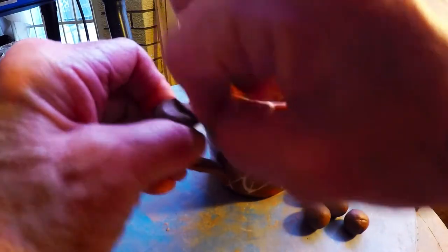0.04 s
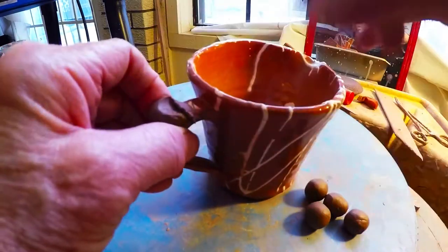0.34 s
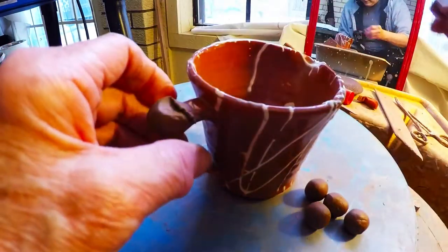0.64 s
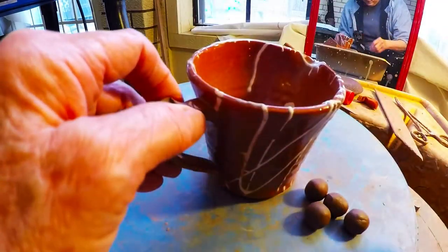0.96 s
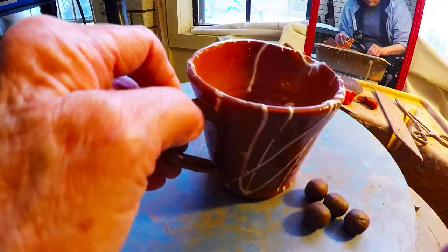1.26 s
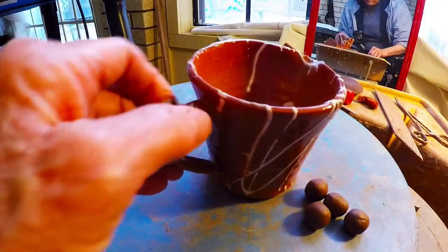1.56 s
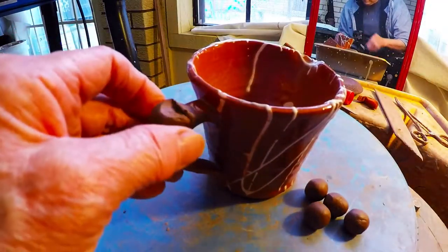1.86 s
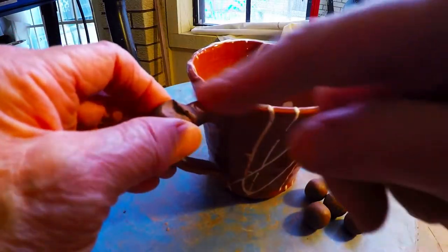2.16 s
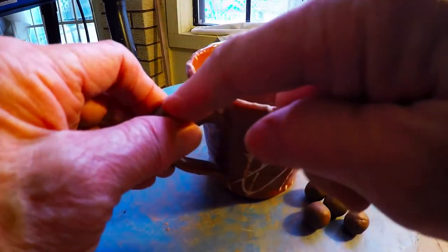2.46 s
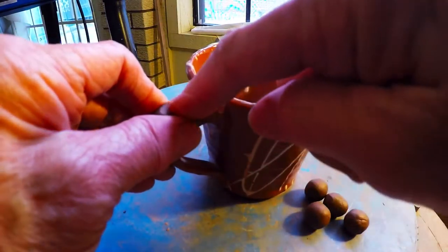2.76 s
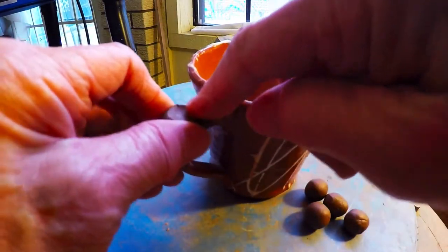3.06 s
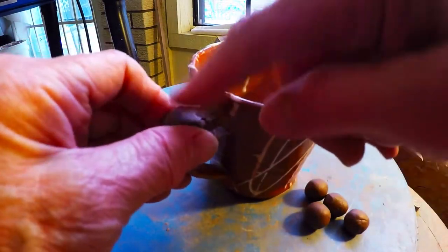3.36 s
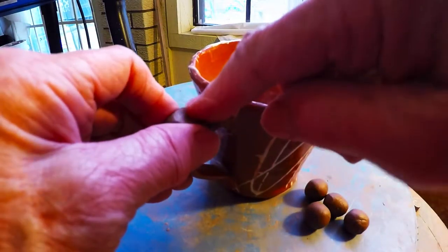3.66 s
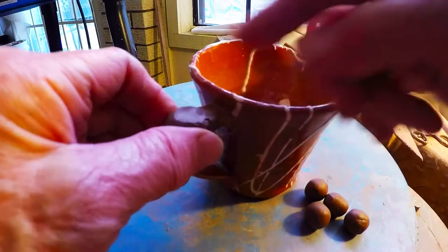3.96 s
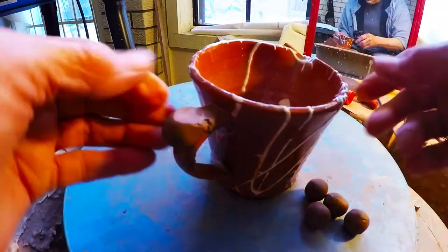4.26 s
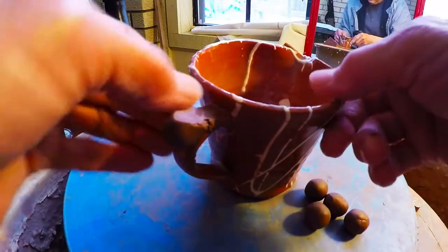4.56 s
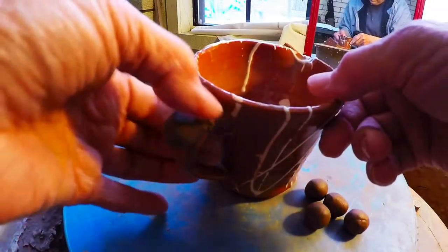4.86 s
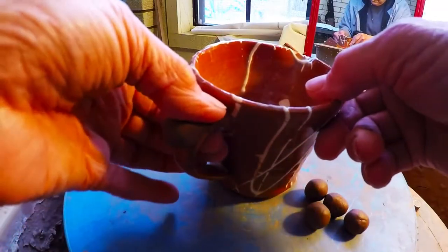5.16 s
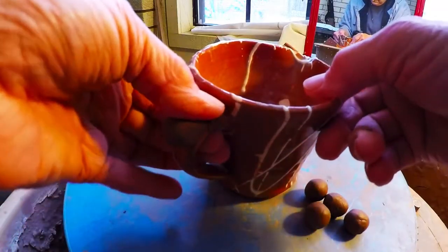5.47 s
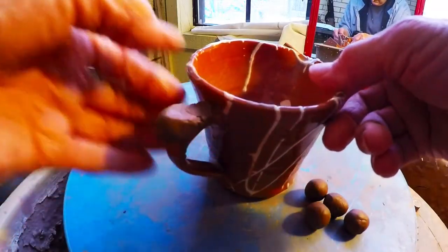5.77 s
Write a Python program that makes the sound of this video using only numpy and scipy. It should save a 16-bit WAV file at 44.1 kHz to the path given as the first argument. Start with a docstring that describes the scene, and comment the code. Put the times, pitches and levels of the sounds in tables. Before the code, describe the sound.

A few dull knocks from a rocking pottery wheel and mug, between faint, short smears and tiny ticks of damp clay.

```python
"""Smoothing clay onto a mug handle

A quiet studio, the microphone close to a damp mug on a banding wheel. Fingers press and smear soft clay
onto the handle; skin drags on the clay and sounds the mug and the wheel. When a hand lets go, the wheel
rocks with a dull knock and the bench shudders. Sticky clay parts from the skin with tiny ticks."""
import sys
import numpy as np
from scipy import signal
from scipy.fft import rfft, irfft, next_fast_len
from scipy.io import wavfile
from scipy.ndimage import map_coordinates

SR = 44100
rng = np.random.default_rng(int(sys.argv[2]) if len(sys.argv) > 2 else 0)


def waveform_to_disk(signal):
    """Save audio, clipped to [-1, 1], as 16-bit WAV at the path in sys.argv[1]."""
    frames = np.transpose(np.atleast_2d(signal))
    scaled = np.clip(frames, -1, 1) * 32767
    samples = np.round(scaled).astype(np.int16)
    wavfile.write(sys.argv[1], SR, samples)


N = 265305

# resonances of wheel, hollow mug, handle and mug wall: (frequency [Hz], width [Hz], gain [dB])
WHEEL_BODY = [(331, 73, -1), (385.7, 56, 1), (560, 51, -10.5)]
MUG_BODY = [(775, 40, -4), (849, 71, -3), (1062, 37, -25)]
HANDLE_BODY = [(575.7, 106, 2.5), (1074, 150, -7.5)]
MUG_WALL = [(1723, 74, 7), (2026, 290, -1.5), (2550, 230, -2), (3265, 90, -6), (3740, 300, -3),
            (4096, 190, 0), (5640, 430, -12), (9300, 610, -13)]
# rasp of the grit in the clay: (frequency [Hz], gain [dB])
GRIT_SPECTRUM = [(500, -16.5), (1200, 7), (2000, -8.5), (3100, -5), (4000, -4.5), (4700, -5.5),
                 (6100, -6.5), (7200, -13.5), (11000, -17.5), (15500, -23)]
# finger strokes, close up:
# (time [s], length [s], force [dB], mug share [dB], handle share [dB], grit share [dB])
STROKES = [(0.064, .015, -51.5, -18, -1, -5.5), (0.084, 0.059, -45.5, -16, -1.5, -4.5),
           (0.146, .055, -34.5, -4, -6, -8), (1.562, 0.017, -55.5, 1.5, -24, -7),
           (1.643, 0.033, -55.5, 7, -16, -7.5), (1.774, 0.046, -56.5, -5, -24, -23),
           (2.176, 0.04, -60, 3, -19, -7), (2.4, 0.022, -57, -10, -25, -12),
           (3.041, 0.039, -53, 13, -6, 3.5), (3.08, 0.071, -47.5, -1, -21, -6),
           (3.319, 0.019, -62.5, -7, 0, -15), (3.44, 0.014, -60.5, -10, -15, -12),
           (3.577, 0.044, -49, -3.5, -12, -5.5), (4.025, 0.022, -48.5, -17, -22, -17),
           (4.956, .11, -48.5, -6.5, -11.5, -14), (5.613, 0.098, -47, -9.5, -4, -6)]

def rubbing(wall_db=-6, rasp_db=-1, grip_spread=.04):
    """Dragging skin drives wheel, mug and handle; grit rasps and sounds the mug's wall."""
    out, t = np.zeros(N), np.arange(SR // 4) / SR
    for start, length, force_db, mug_db, handle_db, grit_db in STROKES:
        drag = slips(len(t), per_second=2500, spread_db=3.5)
        grains = slips(len(t), per_second=2200, spread_db=2.5)
        wheel = resonate(drag, WHEEL_BODY)
        mug = amp(mug_db) * resonate(drag, MUG_BODY) + amp(handle_db) * resonate(drag, HANDLE_BODY)
        grip_shift = np.exp(grip_spread * rng.standard_normal())  # each grip retunes the wall
        wall = amp(wall_db) * resonate(grains, MUG_WALL, grip_shift)
        rasp = amp(rasp_db) * coloured(grains, GRIT_SPECTRUM)
        grit = amp(grit_db) * (wall + rasp)
        # as the stroke slows, mug and grit die faster than the wheel
        wheel *= pressure(t, length, sag_db_per_s=53)
        mug *= pressure(t, length, sag_db_per_s=70)
        grit *= pressure(t, length, sag_db_per_s=102)
        add(out, start, amp(force_db) * (wheel + mug + grit))
    return out


def slips(size, per_second, spread_db):
    """Tiny stick-slip jerks of skin on clay, at random times and strengths."""
    slipped = rng.random(size) < per_second / SR
    strength = amp(spread_db * rng.standard_normal(size))
    direction = np.sign(rng.standard_normal(size))
    return slipped * strength * direction


def pressure(t, length, sag_db_per_s, grip_s=.012, lift_s=.021):
    """The finger grips, eases off steadily, and lifts after length seconds."""
    grip = np.clip(t / grip_s, 0, 1)
    lift = np.exp(-np.maximum(t - length, 0) / lift_s)
    return grip * amp(-sag_db_per_s * t) * lift


# modes of the knocked wheel: (multiple of its note [ratio], gain [dB])
WHEEL_MODES = [(1, -0.5), (1.55, -18)]
# modes of the knocked mug, and spectrum of the clack: (frequency [Hz], gain [dB])
MUG_MODES = [(826, 1), (747, -3), (1170, -22.5)]
CLACK_SPECTRUM = [(300, -29), (1100, 8.5), (2000, 5.5), (2800, -5), (4000, -4.5), (5500, -25.5),
                  (12000, -39)]
# the wheel rocks on its spindle:
# (time [s], wheel note [Hz], wheel level [dB], mug level [dB], clack level [dB])
KNOCKS = [(0.158, 345, -18, -43, -51.5), (0.163, 264, -21.5, -16.5, -38), (0.1704, 304, -33, -17, -43),
          (0.176, 325, -17.5, -47, -48), (4.069, 375, -21, -20, -37), (4.111, 362, -21.5, -26.5, -49),
          (5.7005, 345.6, -25, -37, -71), (5.721, 372, -32, -58, -72)]

def knocks(clack_t60=.056, clack_attack_s=.0011):
    """A clack, then the light mug, then the heavy wheel, whose note shifts with the hands' load."""
    out, t = np.zeros(N), np.arange(SR // 4) / SR
    clack_envelope = amp(-60 * t / clack_t60) * (1 - np.exp(-t / clack_attack_s))
    for start, note_hz, wheel_db, mug_db, clack_db in KNOCKS:
        clack = coloured(rng.standard_normal(len(t)), CLACK_SPECTRUM) * clack_envelope
        mug = damped(MUG_MODES, t, swell_s=.004, sharpness=2.8)
        wheel_modes = [(ratio * note_hz, db) for ratio, db in WHEEL_MODES]
        wheel = damped(wheel_modes, t, swell_s=.0115, sharpness=5)
        add(out, start, amp(clack_db) * clack + amp(mug_db) * mug + amp(wheel_db) * wheel)
    return out


def damped(modes, t, swell_s, sharpness):
    """Heavily damped modes that build up for swell_s and die within a few cycles."""
    ring = sum(amp(db) * detuned_sine(hz, t) for hz, db in modes)
    return ring * (t / swell_s * np.exp(1 - t / swell_s)) ** sharpness


# the bench's slow sway and its top board: (frequency [Hz], gain [dB], t60 [s])
SWAY_MODES = [(51.2, -0.5, 0.48), (81.34, -4.5, 0.6)]
BOARD_MODES = [(121.7, -3, 0.26), (184.8, 1.5, 0.19), (252.3, -1, 0.2), (552, -3, 0.073)]
# a hand leans on the mug or lets go: (time [s], sway level [dB], thud level [dB])
SHOVES = [(0.166, -28, -32), (2.417, -44, -60.5), (3.236, -44, -63), (4.119, -34.5, -43), (5.055, -45, -60),
          (5.704, -35, -35.5)]

def bench(shudder_share_db=-12):
    """Every shove thuds in the top board, and the bench sways on under a swell of rumble."""
    out, t = np.zeros(N), np.arange(SR) / SR
    shudder = np.zeros(N)
    for start, sway_db, thud_db in SHOVES:
        sway = amp(sway_db) * ringing(SWAY_MODES, t, attack_s=.0063)
        thud = amp(thud_db) * ringing(BOARD_MODES, t, attack_s=.0028)
        add(out, start, sway + thud)
        shudder += amp(sway_db + shudder_share_db) * swell(start, rise_s=.061, fade_s=.2)
    return out + shudder * coloured(rng.standard_normal(N), RUMBLE_SPECTRUM)


def ringing(modes, t, attack_s):
    """Modes that set in softly and die away, each at its own rate."""
    ring = sum(amp(db - 60 * t / t60) * detuned_sine(hz, t) for hz, db, t60 in modes)
    return ring * (1 - np.exp(-t / attack_s))


# clay snaps off the skin: (time [s], level [dB], band centre [Hz])
TICKS = [(0.556, -32.5, 11360), (3.5895, -44.5, 3460), (4.771, -54.5, 2300), (4.786, -50, 2960),
         (5.548, -50, 3500), (5.62, -52.5, 1800), (5.674, -44.5, 3500), (5.714, -32, 11000),
         (5.848, -42.5, 7980)]
# wet pops of the clay: (time [s], level [dB])
POPS = [(0.676, -51.5), (2.066, -52.5), (4.787, -43.5), (5.63, -42.5)]

def sticky_clay(tick_cycles=40):
    """Clay parts from the skin in bright ticks, shorter the higher they are, and duller pops."""
    ticks = sum(amp(db) * burst(start, hz, octaves=.85, t60=tick_cycles / hz) for start, db, hz in TICKS)
    pops = sum(amp(db) * burst(start, centre_hz=1130, octaves=.27, t60=.015) for start, db in POPS)
    return ticks + pops


# partials of the fingertip's squeak: (frequency [Hz], level [dB], rise [s], fade [s])
SQUEAK_PARTIALS = [(349.5, -50.5, 0.029, 0.029), (914, -52, 0.025, 0.074), (1748, -55, 0.014, 0.018),
                   (2800, -69, 0.017, 0.018), (5100, -61, 0.02, .02), (5400, -65, 0.037, 0.0095),
                   (6900, -66.5, 0.025, 0.013)]

def squeak(peak_at=1.672, waver=.0059, jitter=.04):
    """A fingertip's slips lock into a faint tone; their uneven timing blurs the upper partials."""
    slip_speed = 1 + jitter * wobble(2500) + waver * wobble(98)
    clock = np.cumsum(slip_speed) / SR
    return sum(amp(db) * swell(peak_at, rise_s, fade_s) * np.sin(2 * np.pi * hz * clock)
               for hz, db, rise_s, fade_s in SQUEAK_PARTIALS)


def skin_brush():
    """Skin brushes skin once as the hand turns."""
    return amp(-60) * burst(start=4.309, centre_hz=8020, octaves=1.3, t60=.13)


# decay of the room around the bench: (frequency [Hz], t60 [s])
STUDIO_DECAY = [(100, 0.34), (400, 0.3), (900, 0.27), (3000, 0.426), (10000, 0.12)]

def studio_reverb(x, delay_s=.012):
    """The small room's answer reaches the microphone just after the direct sound; top treble dies first."""
    hz, t, noise = signal.stft(rng.standard_normal(SR // 2), SR, nperseg=256)
    decay = amp(-60 * t / along(STUDIO_DECAY, hz)[:, None])
    tail = signal.istft(noise * decay, SR, nperseg=256)[1]
    delayed = np.pad(x, (round(delay_s * SR), 0))
    return signal.fftconvolve(delayed, tail / np.linalg.norm(tail))[:N]


# room tone at the microphone: (frequency [Hz], gain [dB])
RUMBLE_SPECTRUM = [(11, -19), (18, -5), (33, -1), (59, -6), (81, -8.5), (102, -14.5), (129, -19),
                   (170, -26), (220, -49), (370, -120)]
HISS_SPECTRUM = [(88, -27), (150, -5.5), (205, -2.5), (263, -4), (319, -10), (380, -8.5), (654, -15.5),
                 (794, -13.5), (858, -14.5), (927, -16), (1220, -17.5), (3140, -18), (14500, -29),
                 (15400, -34.5)]

def room_tone(rumble_db=-55.5, hiss_db=-64):
    """Low building rumble under an even hiss."""
    rumble = amp(rumble_db) * coloured(rng.standard_normal(N), RUMBLE_SPECTRUM)
    hiss = amp(hiss_db) * coloured(rng.standard_normal(N), HISS_SPECTRUM)
    return rumble + hiss


def burst(start, centre_hz, octaves, t60):
    """A tiny decaying burst of noise in one band, start seconds into the scene."""
    lead_s = .005  # room for the filter to ring ahead of the onset
    out, t = np.zeros(N), np.arange(SR // 10) / SR - lead_s
    decay = (t >= 0) * amp(-60 * np.abs(t) / t60)
    band = lambda hz: np.exp(-.5 * (np.log2((hz + 1) / centre_hz) / octaves) ** 2)
    noise = unit(filtered(decay * rng.standard_normal(len(t)), band))
    add(out, start - lead_s, np.sqrt(np.mean(decay ** 2)) * noise)
    return out


def resonate(x, body, shift=1):
    """x through a set of resonances, all moved by the factor shift, at rms 1."""
    def response(hz):
        f = hz / shift
        return sum(amp(db) * (1j * f * width / (centre ** 2 - f ** 2 + 1j * f * width)) ** 2
                   for centre, width, db in body)
    return unit(filtered(x, response))


def detuned_sine(hz, t, spread=.027):
    """One mode, at a slightly new pitch each time."""
    return np.sin(2 * np.pi * hz * (1 + spread * rng.standard_normal()) * t)


def swell(peak_at, rise_s, fade_s):
    """A bell-shaped envelope that peaks peak_at seconds into the scene."""
    t = np.arange(N) / SR - peak_at
    return np.exp(-np.abs(np.where(t < 0, t / rise_s, t / fade_s)) ** 1.47)


def wobble(rate):
    """A smooth random curve, rate knots a second."""
    knots = rng.standard_normal(int(N * rate / SR) + 4)
    return map_coordinates(knots, [np.arange(N) * rate / SR])


def coloured(x, spectrum):
    """x shaped by a spectrum, at rms 1."""
    return unit(filtered(x, lambda hz: amp(along(spectrum, hz))))


def filtered(x, response):
    """x through a frequency response."""
    size = next_fast_len(len(x) + SR // 4)
    return irfft(rfft(x, size) * response(np.fft.rfftfreq(size, 1 / SR)), size)[:len(x)]


def along(points, hz):
    """(frequency [Hz], value) points read on a log axis."""
    frequencies, values = np.transpose(points)
    return np.interp(np.log(hz + 1), np.log(frequencies), values)


def add(track, start, sound):
    """Mix a sound into the track at start seconds."""
    part = track[round(start * SR):][:len(sound)]
    part += sound[:len(part)]


def amp(db):
    """Decibels to gain."""
    return 10 ** (np.asarray(db) / 20)


def unit(x):
    """Scaled to rms 1."""
    return x / np.sqrt(np.mean(x ** 2) + 1e-20)


def scene():
    """Hands, mug and wheel close to one microphone, the room behind them."""
    blows = knocks()
    touch = rubbing() + squeak() + sticky_clay() + skin_brush()
    room = studio_reverb(amp(-15) * blows + amp(-17) * touch)
    return (blows + touch + room + bench() + room_tone())[None]


def record(dry, top_hz=15550):
    """The mono recorder keeps nothing above its band limit."""
    return filtered(dry[0], lambda hz: hz < top_hz)[None]


dry = scene()
out = record(dry)
waveform_to_disk(out)
```